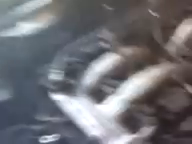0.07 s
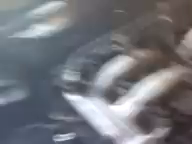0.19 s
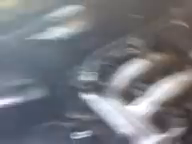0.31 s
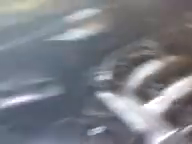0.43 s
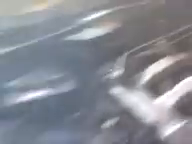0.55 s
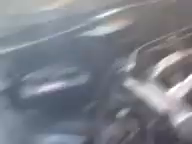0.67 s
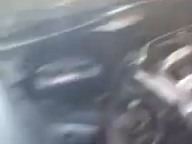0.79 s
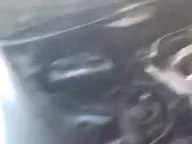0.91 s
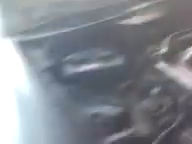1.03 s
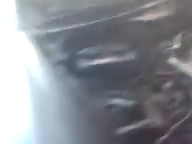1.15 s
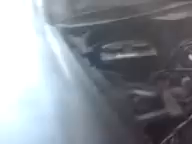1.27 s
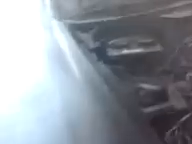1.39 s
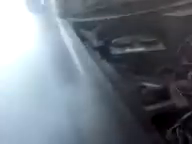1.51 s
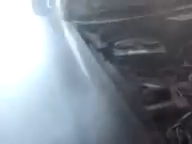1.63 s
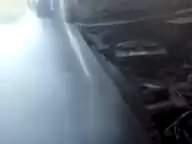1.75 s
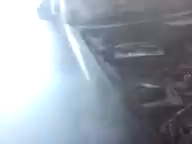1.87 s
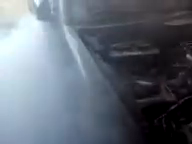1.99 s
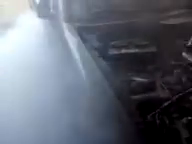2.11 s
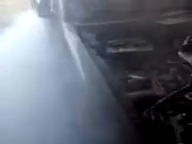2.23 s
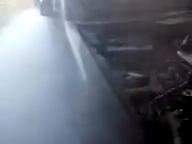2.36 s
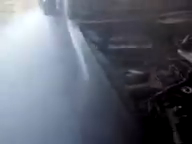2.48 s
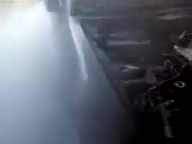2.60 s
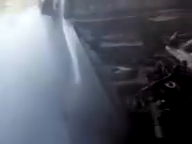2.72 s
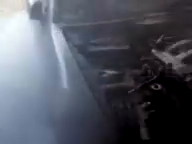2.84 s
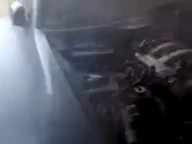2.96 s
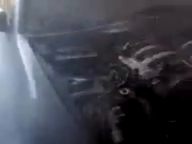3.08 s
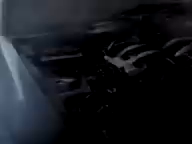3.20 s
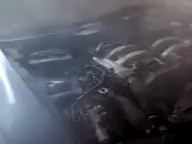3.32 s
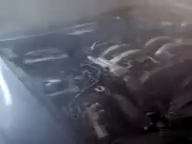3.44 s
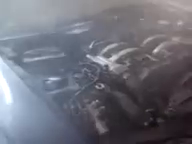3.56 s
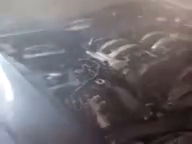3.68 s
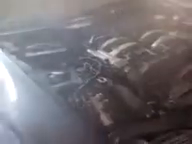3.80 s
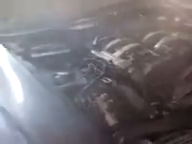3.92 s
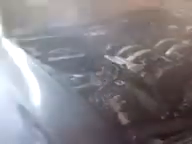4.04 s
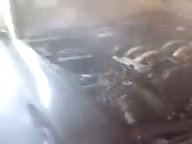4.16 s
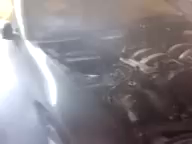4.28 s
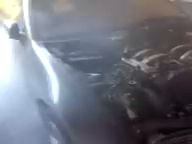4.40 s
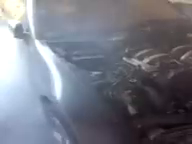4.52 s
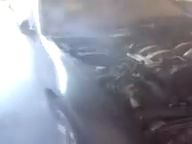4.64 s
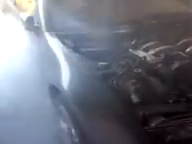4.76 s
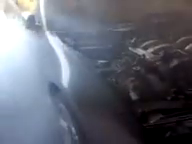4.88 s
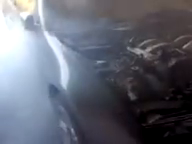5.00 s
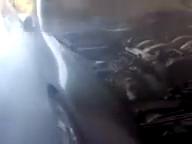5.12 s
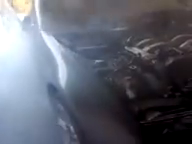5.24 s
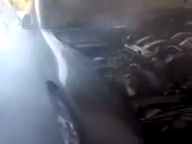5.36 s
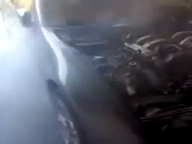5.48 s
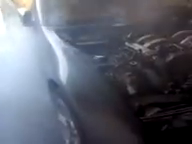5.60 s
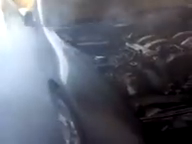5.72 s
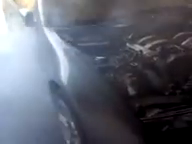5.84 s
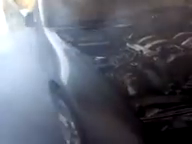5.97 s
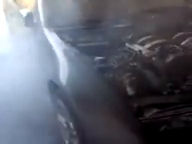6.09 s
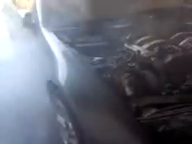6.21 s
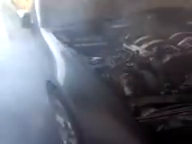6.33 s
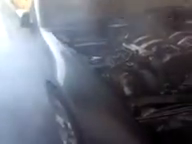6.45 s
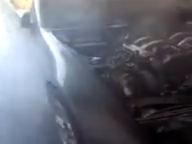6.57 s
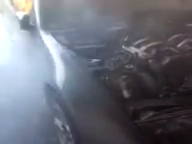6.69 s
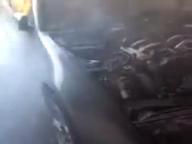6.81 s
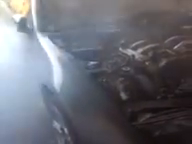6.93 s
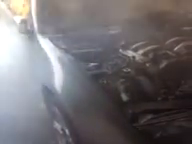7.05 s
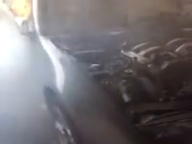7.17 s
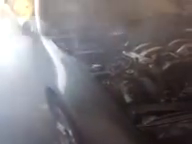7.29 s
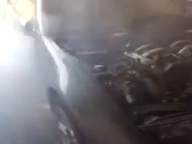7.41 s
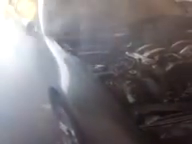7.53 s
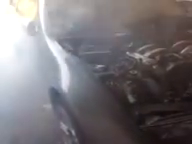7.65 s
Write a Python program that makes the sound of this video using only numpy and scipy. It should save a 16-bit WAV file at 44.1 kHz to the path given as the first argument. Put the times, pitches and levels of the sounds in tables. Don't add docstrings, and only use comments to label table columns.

```python
import sys
import numpy as np
from scipy import signal
from scipy.fft import rfft, irfft, next_fast_len
from scipy.io import wavfile
from scipy.ndimage import uniform_filter1d, map_coordinates

SR = 44100
rng = np.random.default_rng(int(sys.argv[2]) if len(sys.argv) > 2 else 0)


def magnitude_from_level(level_db):
    exponent = np.asarray(level_db, float) / 20
    return 10 ** exponent


def to_wav(sig):
    pcm = np.clip(np.atleast_2d(sig), -1, 1) * 32767
    pcm = np.round(pcm).astype(np.int16)
    wavfile.write(sys.argv[1], SR, pcm.T)


N = 339570

# (time [s], four-stroke cycles per second [1/s])
ENGINE_SPEED = [(0.0, 15.055), (0.18, 16.459), (0.5, 15.808), (0.58, 12.265), (0.75, 11.787), (0.95, 9.496),
                (1.15, 8.365), (1.55, 7.293), (1.8, 7.472), (2.1, 7.493), (2.7, 7.915), (3.45, 8.114),
                (4.3, 7.96), (5.5, 7.792), (6.1, 7.761), (7.7, 7.598)]
# (time [s], level [dB])
BOOM_LEVEL = [(0, -4), (.3, -4.5), (.5, -7), (.6, -10), (.8, -14), (1, -15.5), (1.25, -17.5), (1.56, -18.5),
              (2.3, -19.5), (2.8, -18.5), (4.2, -19.5), (5.6, -21), (7.7, -20.5)]
# (boom angle [deg], level [dB], bark angle [deg], level [dB], rasp angle [deg], level [dB])
CYLINDERS = [(65.2, -1.2, 65.7, 0.0, 66.1, 0.0), (183.8, -1.3, 194.8, -1.0, 178.1, -7.1),
             (329.1, -7.0, 311.8, -7.3, 340.1, -14.5), (422.5, -3.7, 473.5, -4.8, 433.2, -7.1),
             (549.6, -4.8, 540.0, -8.2, 557.4, -1.2), (663.6, 0.0, 662.8, -0.6, 674.0, -0.4)]
# (frequency [Hz], width [Hz], level [dB])
BOOM_MODES = [(222.03, 17.8, 12), (223.24, 30.93, 10), (271.6, 65, -4.5)]
# (frequency [Hz], width [Hz], level [dB])
BARK_MODES = [(345.4, 60, -4.5), (396.5, 11, 7), (438.5, 25, -2.1), (476, 53, -6)]
# (frequency [Hz], width [Hz], level [dB])
RASP_MODES = [(526.4, 150.0, -7.9), (681.5, 22.5, -2.8)]
# (frequency [Hz], width [Hz], level [dB])
PLENUM_MODES = [(318, 26, 0.5), (431, 85, -9)]
# (frequency [Hz], width [Hz], level [dB])
BLOCK_NEAR_MODES = [(1225, 42, 1.5), (1400, 196, 4), (1522, 160, 2), (2260, 240, -14.5), (3173, 220, -14.5)]
# (frequency [Hz], width [Hz], level [dB])
BLOCK_SIDE_MODES = [(895, 244, -0.5), (1095, 47, 5), (1320, 114, 4), (2410, 482, -7), (3255, 130, -10.5)]
# (frequency [Hz], width [Hz], level [dB])
TAPPET_MODES = [(645, 69, -0.5), (1125, 70, -2.5), (1204, 120, -4)]
# (frequency [Hz], density [dB per Hz])
FAN_SPECTRUM = [(12, -44.5), (25, -31), (60, -8.5), (110, -7), (200, 1.5), (450, 4.5), (750, -8.5),
                (1250, -10.5), (1700, -12), (2760, -27), (3230, -15.5), (3700, -33), (4300, -50.5)]
# (angle [deg], level [dB])
GEAR_SWELL = [(0, -0.5), (110, 4), (160, 2.5), (300, 3), (480, -0.5), (520, -0.5), (620, 3), (720, 3)]
# (time [s], share of the side face [0-1])
FACING = [(0, 0.97), (1.1, .3), (1.4, 0.11), (2.6, 0.38), (3.1, 0.73), (4.4, 0.6), (4.8, 0.9), (6.4, 1),
          (7, 0.78), (7.7, 0.7)]


def unit(x):
    return x / np.sqrt(np.mean(x ** 2) + 1e-20)


def curves(rows):
    s, *cols = np.transpose(rows)
    return [np.interp(np.arange(N) / SR, s, c) for c in cols]


def wobble(rate):
    knots = rng.standard_normal(int(N * rate / SR) + 4)
    return map_coordinates(knots, [np.arange(N) * rate / SR])


def filtered(x, response):
    m = next_fast_len(N + SR)
    return irfft(rfft(x, m) * response(np.fft.rfftfreq(m, 1 / SR)), m)[..., :N]


def ring(x, modes):
    def response(f):
        total = 0
        for k, (c, w, db) in enumerate(modes):
            total = total + (-1) ** k * magnitude_from_level(db) * 1j * f * w / (c * c - f * f + 1j * f * w)
        return total
    return filtered(x, response)


def steady(x):
    power = uniform_filter1d(x ** 2, SR // 4, mode="reflect")
    return x / np.sqrt(np.abs(power) + 1e-12)


def blows(turns, angle_deg, db, scatter_deg, scatter_db):
    chance = rng.standard_normal((int(turns[-1]) + 1, len(db), 2))
    at = np.arange(len(chance))[:, None] + (angle_deg + scatter_deg * chance[..., 0]) / 720
    place = np.interp(at, turns, np.arange(N)).astype(int)
    size = magnitude_from_level(db + scatter_db * chance[..., 1]) * (at < turns[-1]) * (at > turns[0])
    return np.bincount(place.ravel(), size.ravel(), N)


def side_share():
    return np.clip(curves(FACING)[0], 0, 1)


def throttle(speed):
    wide = np.clip((speed - 12.5) / 3.5, 0, 1)
    idle = np.clip((9.9 - speed) / 1.9, 0, 1)
    return np.array([wide, 1 - wide - idle, idle])


def fan_rush():
    z = signal.stft(rng.standard_normal(N), nperseg=512)[2]
    patches = uniform_filter1d(rng.standard_normal(z.shape), 5, 0)
    patches = uniform_filter1d(patches, 12, 1)
    air = signal.istft(z * magnitude_from_level(3.0 * unit(patches)), nperseg=512)[1][:N]
    hz, gain_db = np.transpose(FAN_SPECTRUM)
    return unit(filtered(air, lambda f: magnitude_from_level(np.interp(np.log(f + 1), np.log(hz), gain_db))))


def valve_rattle(turns, side):
    angles, tick_db = np.arange(24) * 30. + 7, 2.5 * rng.standard_normal(24)
    ticks = blows(turns, angles, tick_db, scatter_deg=3, scatter_db=2)
    rattle = filtered(ticks, lambda f: 1 / (1 + 1j * f / 22)) * rng.standard_normal(N)
    near_face = np.sqrt(1 - side) * steady(ring(rattle, BLOCK_NEAR_MODES))
    return near_face + np.sqrt(side) * steady(ring(rattle, BLOCK_SIDE_MODES))


def loose_tappets(turns, side):
    angles, tap_db = np.array([482, 548, 610, 641]), np.array([1.0, 2.5, -1.5, -9.5])
    taps = blows(turns, angles, tap_db, scatter_deg=0.87, scatter_db=0.0)
    taps = filtered(taps, lambda f: 1 / (1 + (f / 1700) ** 4))
    return side * steady(ring(taps, TAPPET_MODES))


def clatter(turns, db):
    swell_db = np.interp(turns % 1 * 720, *np.transpose(GEAR_SWELL))
    side = side_share()
    rush = magnitude_from_level(1.2 - swell_db / 2) * fan_rush() + magnitude_from_level(-5) * valve_rattle(turns, side)
    return magnitude_from_level(db + 0.17 * wobble(4.5)) * (magnitude_from_level(swell_db) * rush + magnitude_from_level(-5.5) * loose_tappets(turns, side))


def shaft_order(turns, count):
    return np.sqrt(2) * np.sin(2 * np.pi * count * turns + .25 * wobble(3))


def intake_roar(turns):
    crank = 2 * np.pi * turns
    warble = .8 * np.sin(3 * crank) + .55 * wobble(25)
    return 1.3 * np.sin(18 * crank + warble) - .2 * np.sin(15 * crank)


def plenum_pops(turns):
    angle, db = np.transpose(CYLINDERS)[2:4]
    return steady(ring(blows(turns, angle, db, scatter_deg=6, scatter_db=2.2), PLENUM_MODES))


def port_chirp(turns, speed):
    start_deg, length_deg, first_hz, last_hz = 530, 310, 315, 520
    closing = np.clip((turns - start_deg / 720) % 1 * 720 / length_deg, 0, 1)
    sweep_s = length_deg / 720 / speed
    periods = sweep_s * closing * (first_hz + (last_hz - first_hz) * closing / 2)
    return np.sin(np.pi * closing) * np.sin(2 * np.pi * periods)


def pipe(turns, angle_deg, db, scatter_db, modes):
    pulses = blows(turns, angle_deg, db, scatter_deg=.3, scatter_db=scatter_db)
    soft = filtered(pulses, lambda f: 1 / (1 + 1j * f / 900) ** 2 / (1 + (f / 1500) ** 4))
    return steady(ring(soft, modes))


def firing(turns, speed, boom_db, drone_db, bark_db):
    boom_deg, low_db, bark_deg, mid_db, rasp_deg, high_db = np.transpose(CYLINDERS)
    low = pipe(turns, boom_deg, low_db, .7, BOOM_MODES)
    mid = pipe(turns, bark_deg, mid_db, .8, BARK_MODES)
    high = pipe(turns, rasp_deg, high_db, 1.2, RASP_MODES)
    wide = np.clip((speed - 12.5) / 3.8, 0, 1)
    idle = np.clip((9.9 - speed) / 1.9, 0, 1)
    side = side_share()

    boom = np.sqrt(1 - .9 * wide) * np.sqrt(0.53 + 0.36 * idle) * low
    boom += magnitude_from_level(1) * wide * intake_roar(turns)
    boom += magnitude_from_level(drone_db - 2.5) * idle * shaft_order(turns, 18)
    boom += magnitude_from_level(-10.5) * idle * (1 - side) * shaft_order(turns, 30)
    boom += magnitude_from_level(drone_db / 2 - 13.0) * idle * shaft_order(turns, 36)

    bark = magnitude_from_level(-5.5) * np.sqrt(.25 + .75 * idle) * mid
    bark += magnitude_from_level(-6.5 + 1.5 * wobble(3)) * idle * shaft_order(turns, 49)
    bark *= magnitude_from_level((1 + 1.5 * side) * idle * np.cos(2 * np.pi * (turns - 660 / 720)))
    bark += magnitude_from_level(5.5 + wobble(3)) * idle * (.3 + .75 * side) * port_chirp(turns, speed)
    bark += magnitude_from_level(-11.5) * high
    bark += magnitude_from_level(2.0) * np.sqrt(1 - idle) * (1 - 0.89 * wide) * plenum_pops(turns)
    return magnitude_from_level(boom_db) * boom + magnitude_from_level(boom_db + bark_db) * bark


def scene():
    speed = curves(ENGINE_SPEED)[0]
    turns = .174 + np.cumsum(speed) / SR
    boom_db, state = curves(BOOM_LEVEL)[0], throttle(speed)
    bark_db = np.array([-2.5, 1, -3]) @ state
    clatter_db = boom_db + np.array([-9.5, -7.5, -8.5]) @ state
    wing_s, pass_s = 4.5, 0.24
    past_wing = .5 + .5 * np.tanh((np.arange(N) / SR - wing_s) / pass_s)
    drone_db = -24 + 11 * past_wing
    bark_db = bark_db + 1.5 * past_wing
    background = clatter(turns, clatter_db)
    return (background + firing(turns, speed, boom_db, drone_db, bark_db))[None]


def top_cut(x):
    return signal.sosfilt(signal.butter(12, 15800, fs=SR, output="sos"), x)


def record(dry):
    x = filtered(dry, lambda f: 1 / (1 + (f / 4167) ** 40))
    x = np.clip(x, -.705, .705)
    return top_cut(x)


dry = scene()
out = record(dry)
to_wav(out)
```